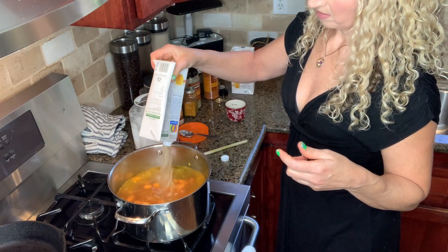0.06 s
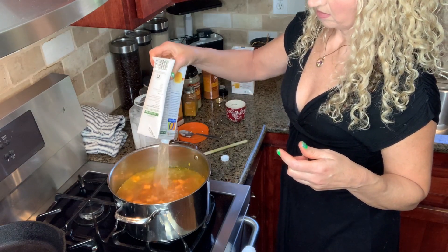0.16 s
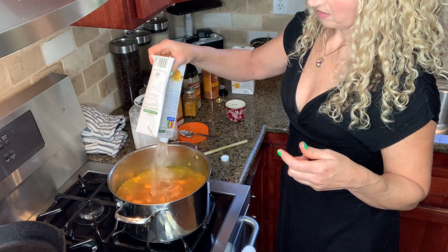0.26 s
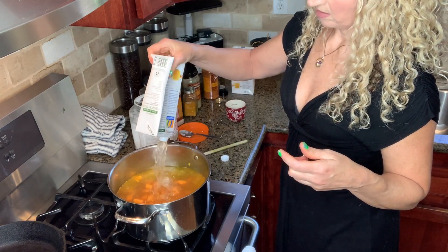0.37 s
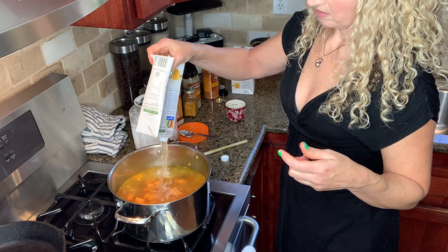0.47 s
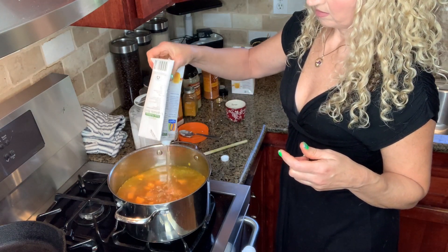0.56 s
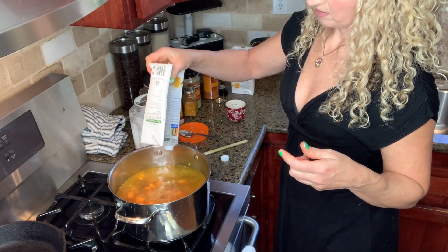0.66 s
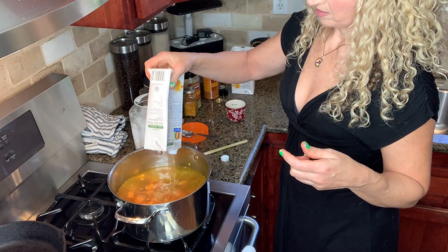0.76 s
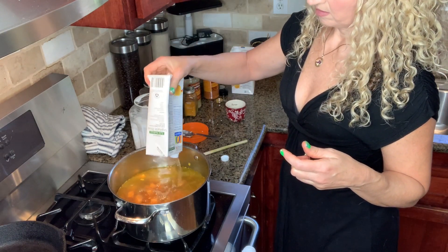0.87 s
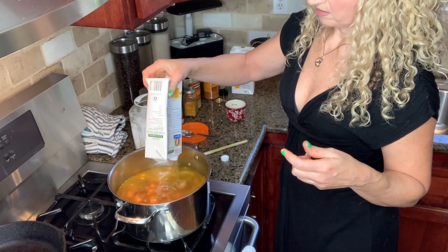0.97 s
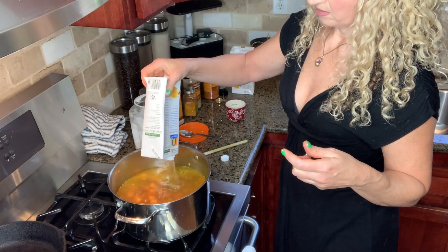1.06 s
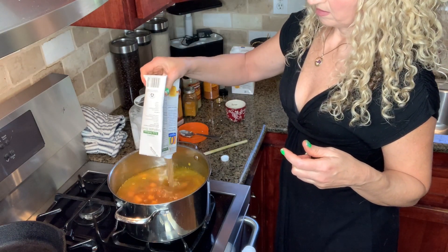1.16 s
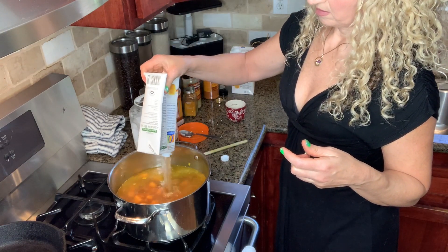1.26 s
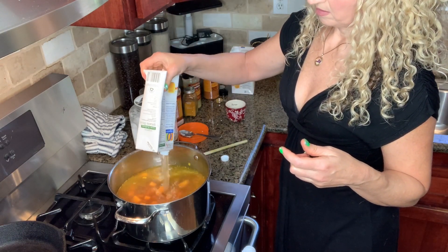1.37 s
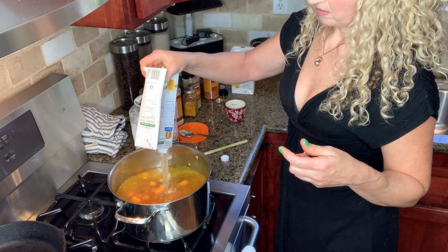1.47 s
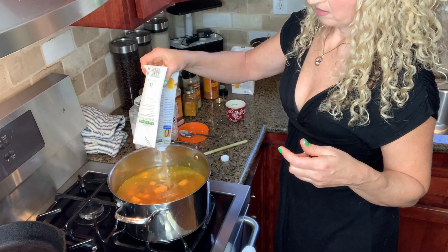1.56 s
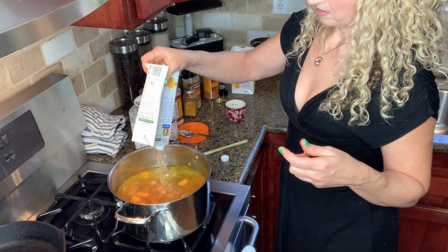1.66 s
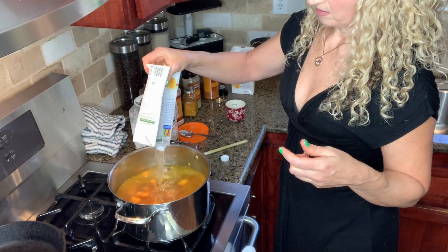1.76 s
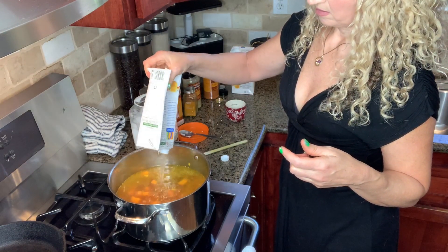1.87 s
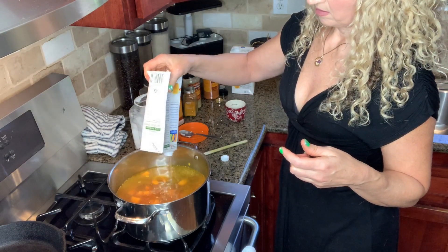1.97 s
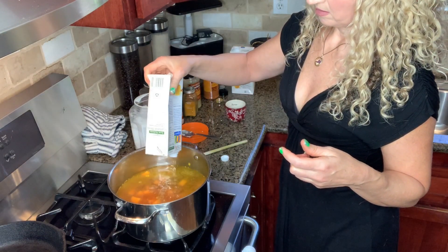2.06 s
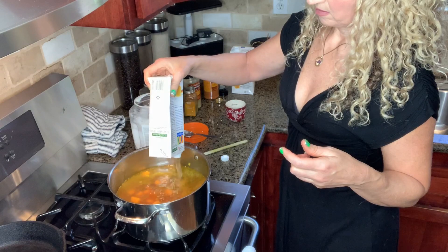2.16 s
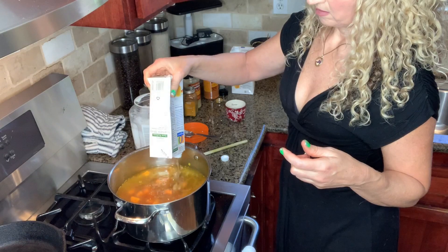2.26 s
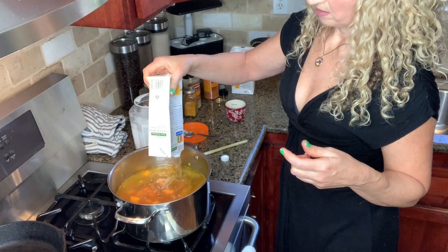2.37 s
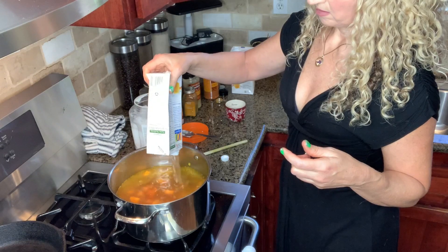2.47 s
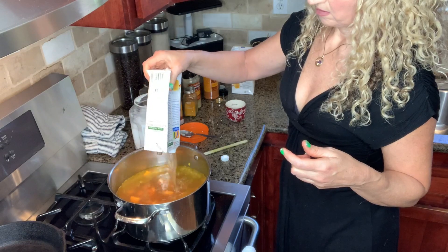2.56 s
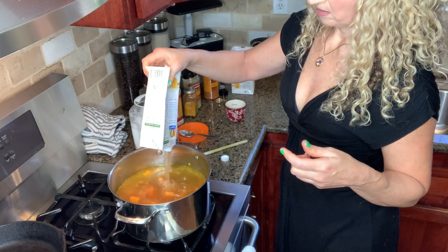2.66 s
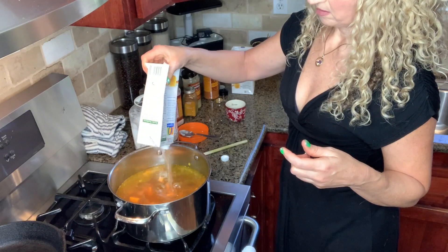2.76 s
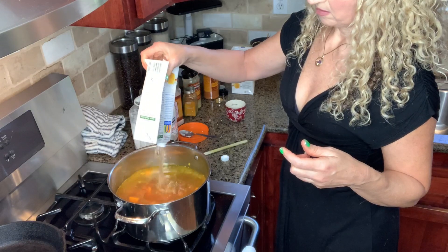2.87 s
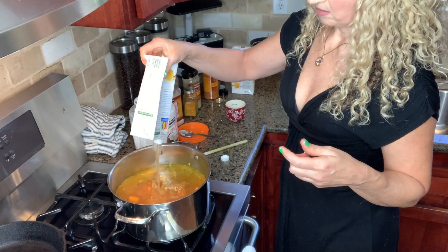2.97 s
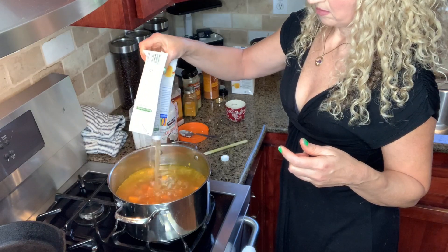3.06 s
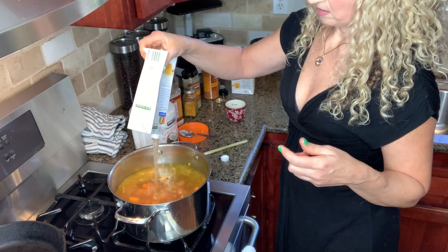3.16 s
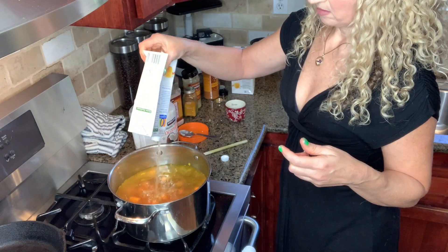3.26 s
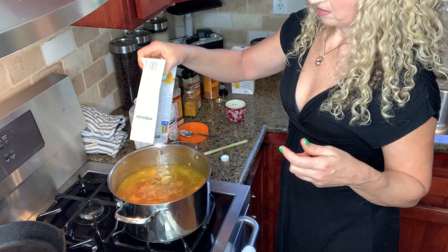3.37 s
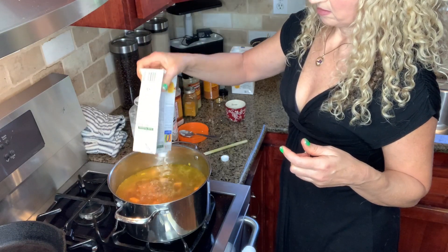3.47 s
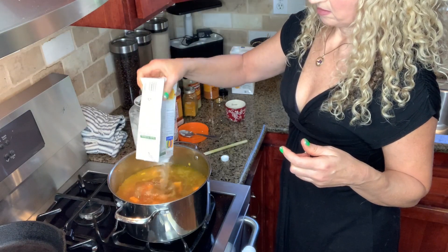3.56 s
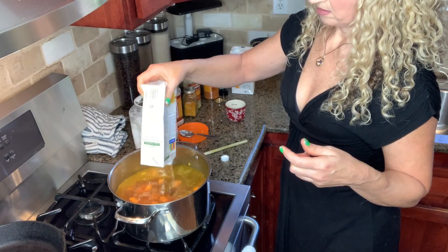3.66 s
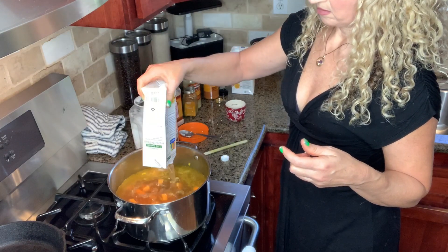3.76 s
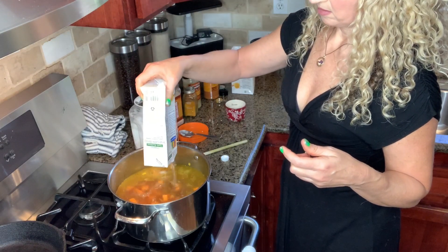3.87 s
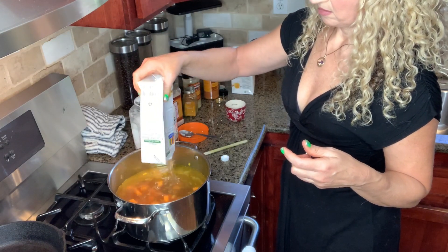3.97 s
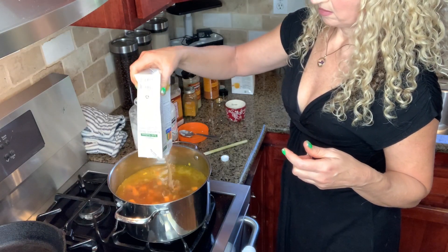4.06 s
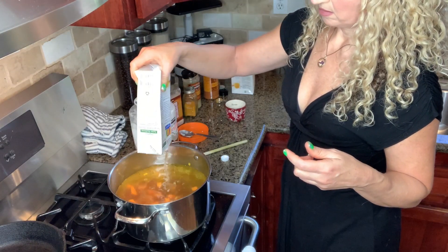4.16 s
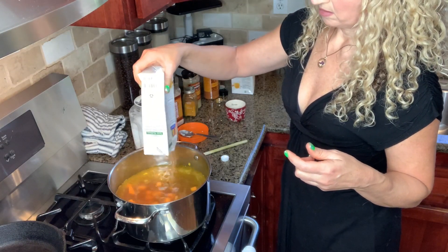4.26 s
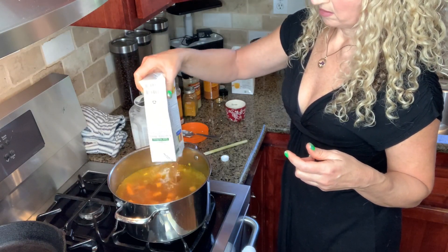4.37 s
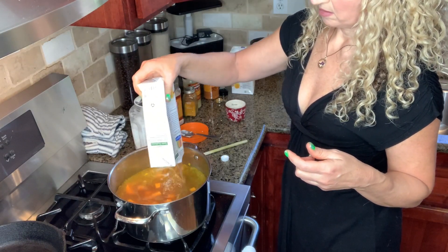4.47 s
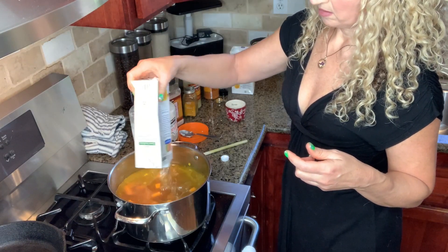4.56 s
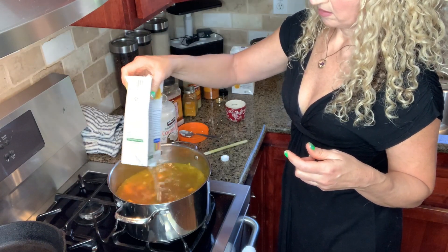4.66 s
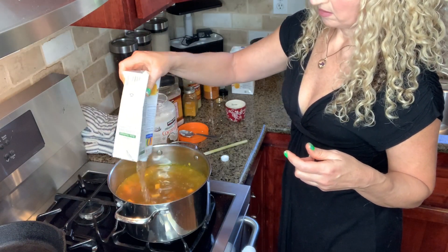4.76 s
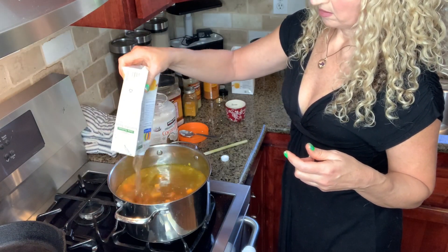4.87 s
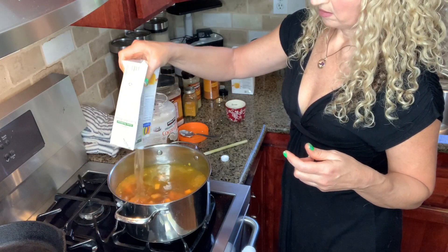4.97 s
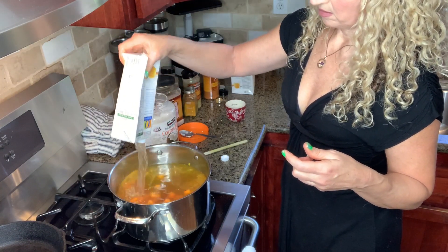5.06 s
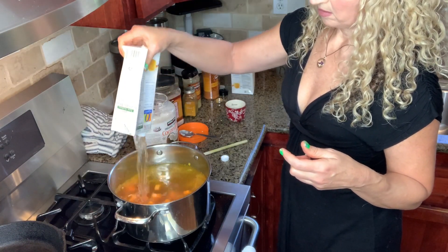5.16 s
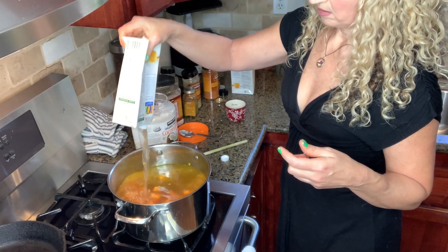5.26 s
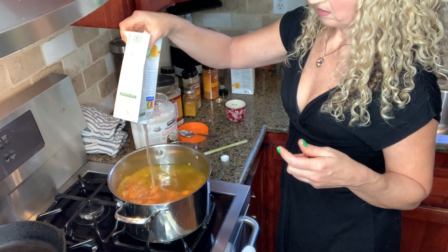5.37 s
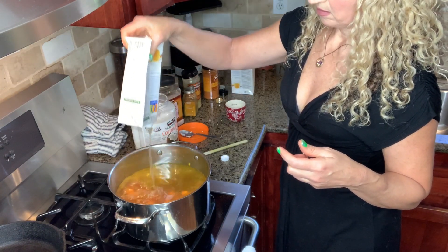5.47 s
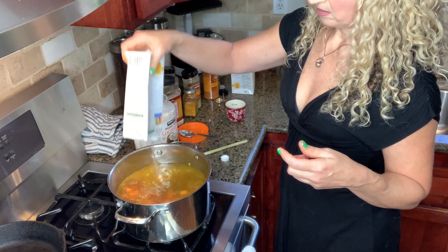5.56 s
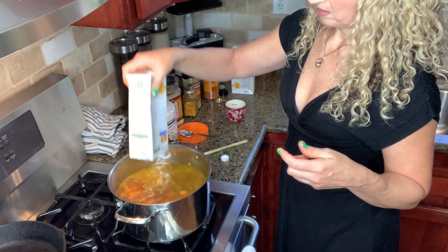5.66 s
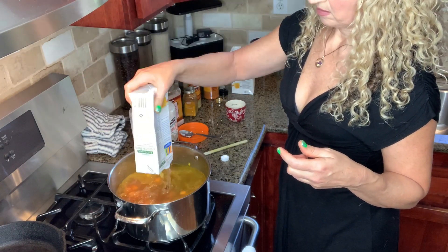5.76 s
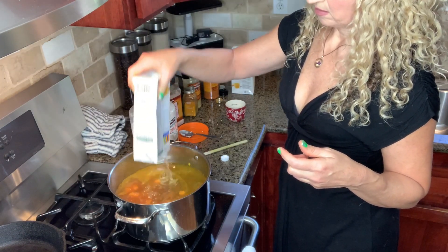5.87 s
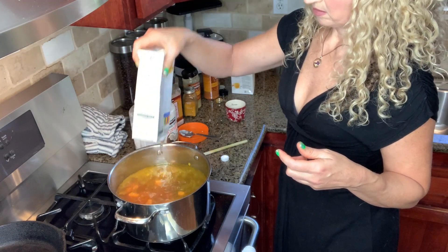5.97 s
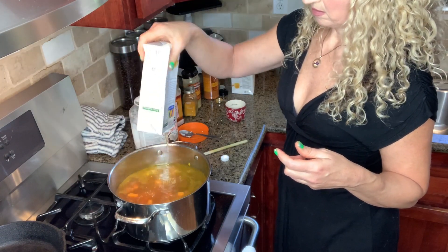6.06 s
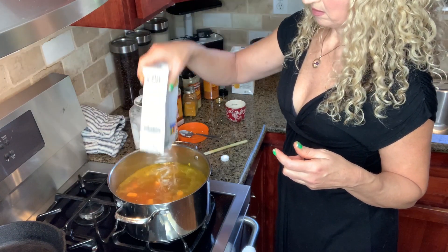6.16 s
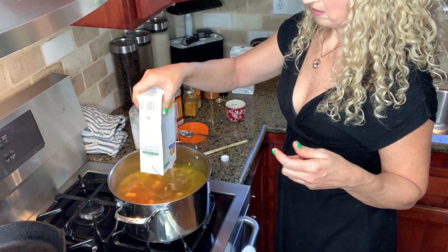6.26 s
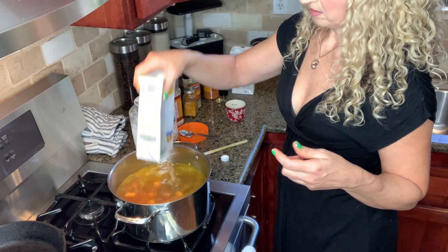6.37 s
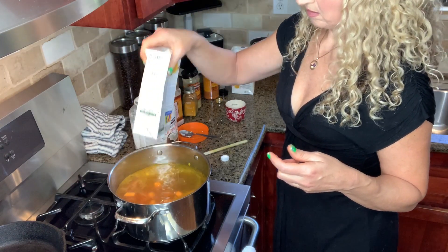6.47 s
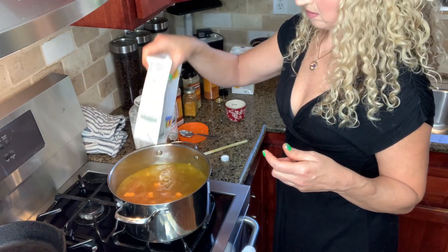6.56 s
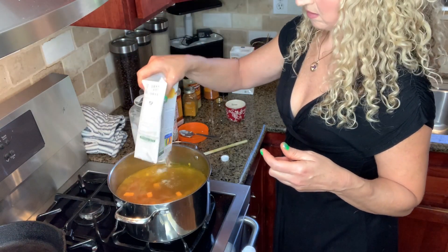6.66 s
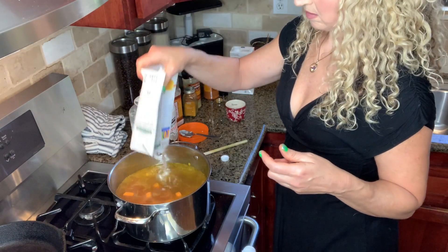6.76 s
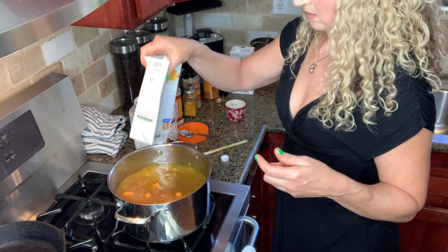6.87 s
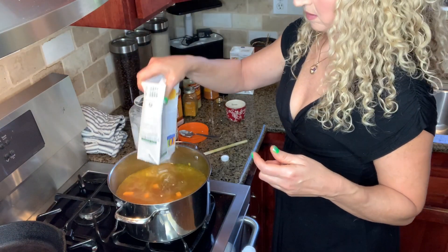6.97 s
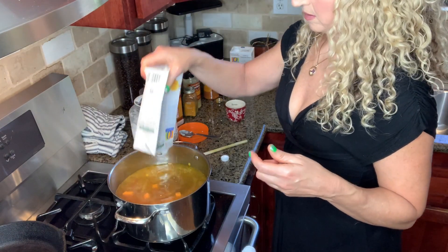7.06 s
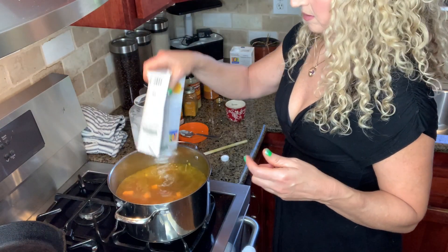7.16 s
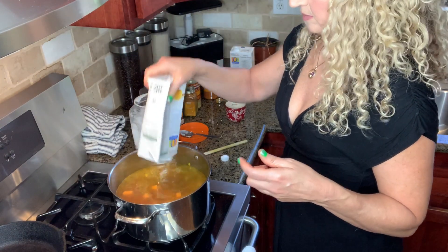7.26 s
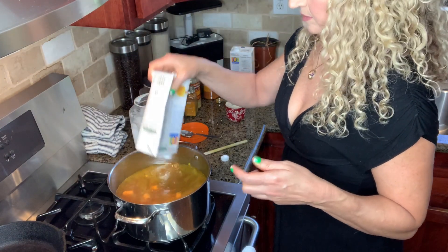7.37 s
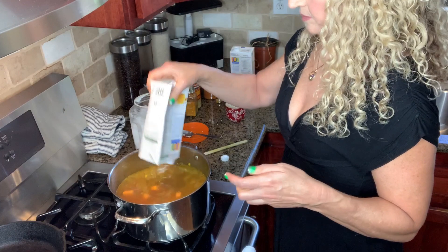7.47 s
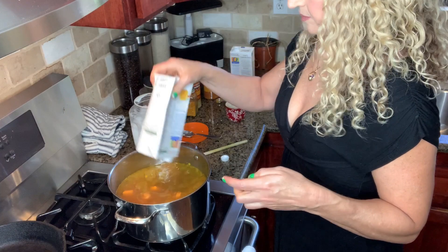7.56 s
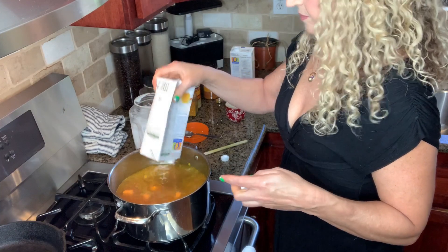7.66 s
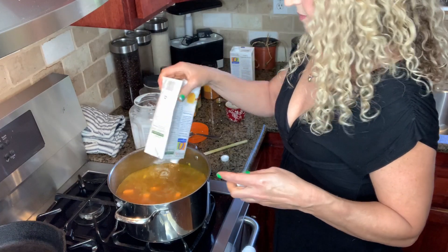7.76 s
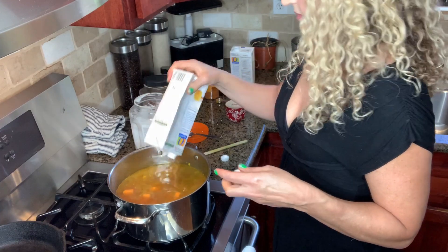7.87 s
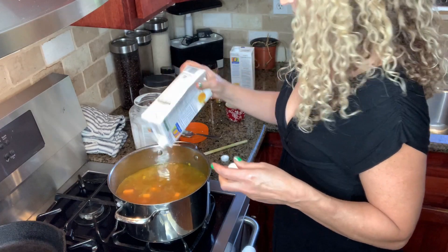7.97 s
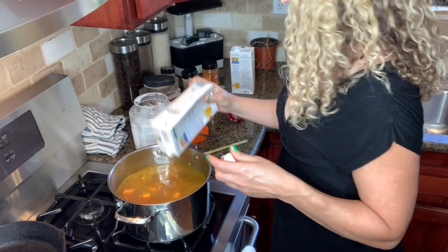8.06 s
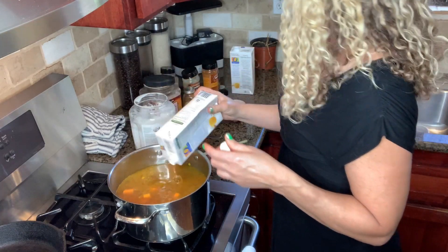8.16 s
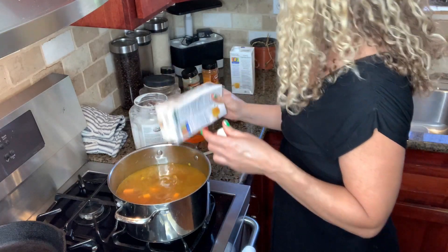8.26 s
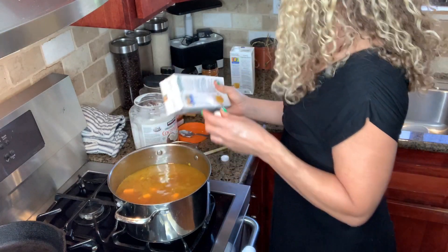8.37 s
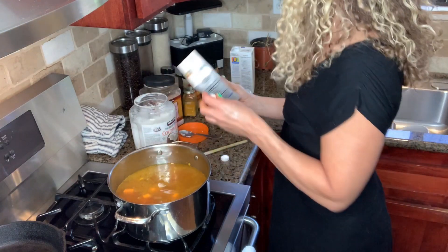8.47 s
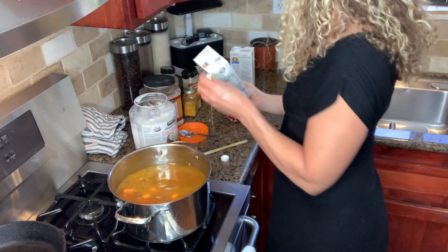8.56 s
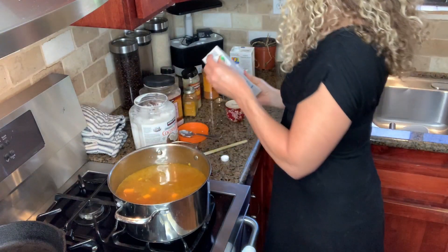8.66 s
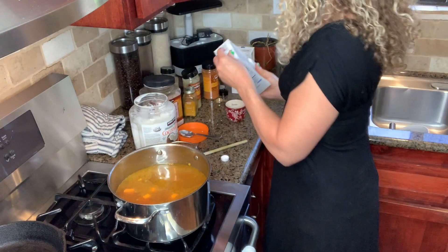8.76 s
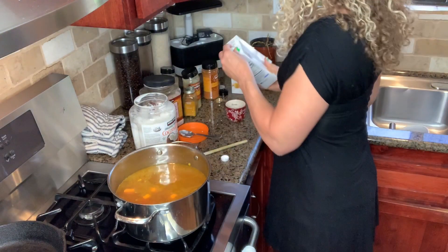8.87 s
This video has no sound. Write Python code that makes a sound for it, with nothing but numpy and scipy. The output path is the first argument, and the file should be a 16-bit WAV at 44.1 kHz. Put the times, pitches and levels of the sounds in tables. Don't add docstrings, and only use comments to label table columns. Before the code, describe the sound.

A close stereo microphone in a small, lightly reverberant kitchen, with a low steady appliance hum throughout. From 0 s broth pours from a carton into a pot of soup: an opening strong trickle, then uneven surges, round mid-pitched plops, small ringing bubbles and bright splashy ticks, with low hollow gulps near 0.7 and 2 s. The stream is fuller around 2.7 to 3.1 s, then breaks into bursts of plops until 4.8 s. A fresh gush comes at 4.9 s, with hollow glugs around 5.2 s. From 5.4 s it is shaken out in spatters and drops, fading after 6.4 s to sparse drips until about 7.2 s. Faint dull carton handling follows until 8 s. At 8.14 s a loud, hard, short knock strikes the counter, with several weaker bounces until 8.33 s. Near quiet returns, then from 8.8 s a soft, dry rub on card swells to the end.

```python
import sys
import numpy as np
from scipy import signal
from scipy.fft import rfft, irfft, next_fast_len
from scipy.io import wavfile

SR = 44100
rng = np.random.default_rng(int(sys.argv[2]) if len(sys.argv) > 2 else 0)


def elevation(decibels):
    levels = np.asarray(decibels, float)
    return 10 ** (levels / 20)


def dump(signal):
    limited = np.clip(np.atleast_2d(signal).T, -1, 1)
    pcm = np.round(limited * 32767).astype(np.int16)
    wavfile.write(sys.argv[1], SR, pcm)


N = 393813

# time_s, level_db
FLOW = [(0, -42), (.6, -57.5), (.85, -66.5), (1.1, -62.5), (1.6, -57.5), (2.35, -58), (2.55, -56),
        (2.68, -47.5), (2.86, -49), (3.05, -48), (3.35, -57.5), (4.0, -73.5), (4.7, -80.5), (4.919, -47),
        (5.3, -55.5), (6.11, -75.5), (6.39, -67), (6.48, -100), (7.55, -125)]
# time_s, level_db, lean_db (from big bubbles towards spray)
SURGES = [(0.724, -43, -4.5), (.97, -52.5, -0.5), (1.306, -43.5, 4), (1.511, -51.5, -4), (1.77, -59, -3),
          (1.91, -48.5, 2), (2.238, -50, -3.5), (3.489, -54, -1.5), (3.64, -49.5, 10.5), (3.73, -66, -12.5),
          (3.9, -55.5, 5.5), (4.14, -53.5, 10), (4.221, -61.5, -6.5), (4.422, -47.5, 8), (4.63, -57, 4.5),
          (4.76, -53.5, 1.5), (5.359, -48.5, -3), (5.568, -53.5, -8), (5.662, -48.5, 10), (5.8, -58, 12),
          (5.96, -58, -4), (6.2, -65, 22), (6.26, -81, -4.5), (6.329, -55.5, 5), (6.66, -84.5, 26),
          (6.75, -83.5, 28), (6.81, -79, 0), (6.959, -60, 10.5), (7.1, -71.5, 12), (7.38, -92, 21)]
# freq_hz, level_db (per Hz)
LARGE_COLOUR = [(180, -39), (300, 7.5), (366, -8.5), (609, -6), (685, -5), (2040, -8.5), (2200, -32),
                (2860, -50.5), (4840, -120)]
SMALL_COLOUR = [(880, -35.5), (1500, 4.5), (2500, 1.5), (2710, 3.5), (3630, 3.5), (4250, 5), (5740, 8.5),
                (9000, 3), (11700, -34), (19800, -120)]
SPRAY_COLOUR = [(5000, -30), (7500, -3.5), (9000, -2), (11000, -5.5), (13000, -7.5), (15500, -4),
                (17000, -0.5)]
# start_s, peak_db, pitch_hz, t60_s
PLOPS = [(0.013, -38, 587, 0.03), (0.173, -45.5, 526, 0.061), (0.689, -47, 1330, 0.026),
         (1.139, -47.5, 465, 0.029), (1.405, -39, 500, 0.019), (1.486, -44.5, 590, 0.047),
         (1.604, -42.5, 620, 0.027), (1.83, -45.5, 788, 0.025), (2.074, -38, 609, 0.05),
         (2.222, -31.5, 1270, 0.015), (2.636, -41.5, 500, 0.059), (2.819, -50, 783, 0.14),
         (3.004, -47.5, 655, 0.081), (3.694, -40, 750, 0.051), (3.744, -42.5, 1200, 0.021),
         (4.109, -34, 804, 0.02), (4.298, -36.5, 1065, 0.022), (4.4, -28.5, 626, 0.018),
         (4.509, -43, 740, 0.023), (4.736, -33.5, 720, 0.012), (4.812, -34.5, 870, 0.016),
         (5.062, -39.5, 730, 0.04), (5.337, -37.5, 533, 0.015), (5.507, -43, 830, 0.024),
         (5.747, -39, 1580, 0.022), (5.855, -38, 588, 0.031), (6.033, -40.5, 1106, 0.028),
         (6.241, -49, 1220, 0.044), (6.787, -44.5, 1010, 0.034), (7.083, -57.5, 1453, 0.12)]
# start_s, peak_db, pitch_hz
SPLASHES = [(.165, -36, 3700), (.2316, -29, 3060), (.4565, -35.5, 4000), (.5276, -28.5, 2080),
            (.6576, -31.5, 4670), (.736, -24, 6370), (.8912, -34, 5560), (.9404, -35, 2730),
            (.9612, -20, 4270), (.9625, -26.5, 2950), (.978, -38, 4740), (1.1386, -41, 4570),
            (1.2367, -30, 1990), (1.27, -37, 2250), (1.272, -37, 3750), (.672, -32.5, 3400),
            (.702, -35, 3240), (1.5125, -32, 6240), (1.5619, -47, 4100), (1.7942, -33, 2200),
            (1.8674, -35, 1890), (1.983, -28, 6040), (2.4368, -30, 5100), (2.5826, -31.5, 5580),
            (2.9175, -30.5, 3500), (3.003, -34, 2130), (3.3922, -30.5, 4830), (3.8025, -36, 2620),
            (4.0698, -42, 3980), (4.1091, -35, 3820), (4.2315, -45, 3300), (4.2974, -47, 3050),
            (4.6007, -32.5, 2380), (4.6573, -36.5, 2300), (4.8095, -33.5, 2760)]
# start_s, peak_db, pitch_hz
DRIPS = [(4.92, -33, 3370), (5.35, -33.5, 1980), (5.5562, -33.5, 6160), (5.6134, -32, 2040),
         (5.673, -31, 3120), (5.7978, -45, 2700), (5.8516, -27, 6040), (5.8524, -37, 2700),
         (5.9313, -28.5, 6830), (5.935, -40, 2740), (5.994, -43, 3090), (6.137, -38.5, 4660),
         (6.1923, -37.5, 6580), (6.2198, -29, 4160), (6.222, -34.5, 3010), (6.2831, -46, 2830),
         (6.289, -40, 1710), (6.323, -45, 854), (6.365, -49, 2770), (6.4, -50, 1830), (6.469, -55, 3900),
         (6.715, -53.5, 6100), (6.7825, -42, 3980), (6.8354, -52, 2290), (6.8448, -52, 4140),
         (6.8836, -50, 2820), (6.885, -48, 2020), (6.9085, -35, 6800), (6.9595, -41, 3400),
         (7.0695, -45, 3400), (7.1498, -65, 3400), (7.3033, -64.5, 3520)]
# start_s, peak_db
SPITS = [(0.23, -35.5), (0.46, -35), (0.7377, -27), (0.962, -34.5), (1.139, -36.5), (1.3056, -34),
         (1.514, -38), (1.5603, -29), (1.602, -34.5), (1.671, -34.5), (1.8005, -32), (2.941, -33.5),
         (3.875, -43), (3.945, -42), (3.995, -45.5), (4.022, -46.5), (4.046, -46), (4.121, -37.5),
         (4.283, -49.5), (4.331, -41.5), (4.4017, -30.5), (5.095, -35.5), (5.356, -34.5), (5.672, -35),
         (5.995, -37), (6.193, -36.5), (6.291, -42.5), (6.5331, -58.5), (6.6014, -58), (6.96, -41),
         (7.0214, -58.5), (6.875, -52.5), (7.125, -55), (7.176, -55), (7.21, -63.5), (7.256, -59.5),
         (7.361, -53.5), (7.585, -71.5), (8.3447, -63), (8.711, -66.5)]
# start_s, peak_db, start_pitch_hz
CHIRPS = [(2.06, -36.5, 2060), (2.19, -43, 1950), (2.36, -48, 1130), (3.877, -43.5, 915),
          (1.01, -47.5, 890), (3.385, -41, 498), (4.915, -41, 1105), (5.012, -41, 1063), (5.1, -39, 713),
          (5.2, -37, 493), (5.53, -45, 497), (5.574, -39, 705), (5.995, -51, 680)]
# start_s, peak_db, pitch_hz
BLIPS = [(.058, -54, 620), (.066, -57, 1127), (.1, -40, 1000), (.229, -43, 470), (.31, -46, 900),
         (.507, -38, 1090), (.529, -43, 498), (.61, -43, 593), (.735, -39, 520), (.818, -39, 1183),
         (1.225, -36.5, 920), (1.266, -58, 745), (1.285, -35, 900), (1.365, -47, 660), (1.52, -36, 766),
         (1.671, -41, 730), (1.794, -42, 1090), (1.893, -37, 1093), (2.018, -33.5, 1500), (2.24, -35, 1270),
         (2.255, -37, 1270), (2.309, -40, 1210), (2.439, -41.5, 875), (2.51, -41, 1000), (2.559, -38, 860),
         (2.584, -34.5, 1070), (2.72, -34.5, 844), (2.74, -42, 1180), (2.86, -48.5, 1230),
         (2.916, -39, 1200), (3.02, -37, 1180), (3.19, -41, 585), (3.355, -54, 1110), (3.395, -36, 1450),
         (3.47, -39, 680), (3.495, -45, 1180), (3.5, -43, 605), (3.63, -42, 1520), (3.671, -46, 910),
         (3.685, -35, 1910), (4.95, -31, 1590), (5.03, -43, 1600), (5.09, -33, 1550), (5.14, -35, 1400),
         (5.36, -35, 1600), (3.801, -39.5, 970), (4.025, -48, 1150), (4.108, -36, 1050), (4.117, -41, 508),
         (4.21, -48, 1150), (4.397, -32, 1200), (4.408, -45, 587), (4.592, -47, 1310), (4.735, -29.5, 1270),
         (4.885, -37.5, 650), (5.151, -39, 507), (5.673, -37.5, 1470), (6.012, -39, 894), (6.82, -52, 1050)]
# start_s, peak_db, pitch_hz
PINGS = [(.015, -46, 2050), (.1002, -39, 3900), (.165, -41, 2050), (.232, -41, 2050), (.285, -34, 2150),
         (.425, -42, 2010), (1.3, -37, 2050), (1.345, -42, 2050), (1.66, -46.5, 2070),
         (1.7389, -38.5, 4150), (1.7679, -42, 2830), (1.9565, -38.5, 3350), (2.37, -38, 2300),
         (2.5581, -38, 2800), (2.6254, -39.5, 2730), (2.755, -42, 2010), (2.88, -46, 2060),
         (2.94, -46, 2050), (3.0729, -38, 3500), (3.1288, -32.5, 4550), (3.165, -42, 2830),
         (3.285, -65, 2050), (3.395, -43.5, 2800), (3.5508, -35, 5560), (3.628, -47, 2700),
         (3.68, -42.5, 2700), (4.12, -40, 2240), (4.245, -44, 2700), (4.4, -38, 2176), (4.405, -36.5, 4350),
         (4.572, -54, 2050), (4.608, -38, 2700), (4.71, -47, 2700), (6.138, -43, 2870), (6.225, -50, 2810),
         (6.795, -59, 2270), (4.3281, -52, 2700), (4.3974, -49, 2760), (4.935, -34.5, 3400),
         (4.94, -36, 2110), (5.0809, -37, 3390), (5.17, -41, 2040), (5.2001, -40, 2080),
         (5.245, -40.5, 1960), (5.3043, -40.5, 2750), (5.455, -45, 2040), (5.613, -38, 3290),
         (5.627, -29, 7000), (5.6486, -37, 2780), (5.675, -28, 5920), (5.727, -42, 3800),
         (5.878, -32.5, 5100), (7.28, -70.5, 5370), (7.322, -66, 5600), (7.352, -66, 5780)]
# start_s, peak_db
TICKS = [(.529, -45), (.892, -49.5), (1.139, -46), (1.559, -39), (1.604, -44), (1.796, -39), (2.917, -30.5),
         (3.802, -46), (4.069, -41), (4.299, -37.5), (4.329, -38.5), (4.398, -33), (4.657, -41),
         (5.612, -38), (5.849, -41.5), (6.136, -56.5), (6.193, -46.5), (6.285, -45.5), (6.47, -73),
         (6.779, -44.5), (6.846, -50), (6.912, -50), (6.96, -42), (7.066, -48), (7.151, -61)]
# freq_hz, width_hz, level_db
POT_AIR = [(498, 14, 8.5), (603.2, 22, 7.5), (854, 52.3, 4.5), (1200, 140, 6.5), (1575, 210, -3),
           (2050, 50, 6.5), (2741, 34, 10), (3400, 39.4, 8), (3900, 570, 5)]
# start_s, peak_db, pitch_hz, t60_s
GULPS = [(0.66, -40, 141, 0.27), (0.697, -50, 162, 0.23), (0.729, -41, 308, 0.1),
         (1.984, -36.5, 157, 0.084), (5.064, -53, 60, 0.99), (5.154, -31.5, 302, 0.069),
         (5.202, -26, 279, 0.035), (5.224, -38, 298, 0.17), (5.256, -38.5, 294, 0.11),
         (5.3, -42, 303, 0.088), (5.201, -47.5, 148, 0.32), (5.384, -48, 305, 0.12),
         (5.339, -40, 297, 0.098), (5.358, -54, 62, 0.64)]
# start_s, level_db
KNOCK_CONTACTS = [
    (8.133, -37),
    (8.1403, -11.5),
    (8.163, -40),
    (8.176, -31.5),
    (8.198, -31.5),
    (8.233, -35),
    (8.286, -44.5),
    (8.33, -46),
]
# freq_hz, level_db, t60_s
COUNTER_MODES = [(62, -16, 0.34), (95.2, -15.5, 0.2), (121.1, -20, 0.39), (159, -19, 0.15),
                 (249, -21, 0.14), (315, -8.5, 0.042), (514, 2.5, 0.029), (626, -8.5, 0.041),
                 (890, 0, 0.028), (1160, -6, 0.018), (1212, -0.5, 0.029), (1270, -25.5, 0.045),
                 (1600, -15.5, 0.016), (2265, -3.5, 0.0059), (2700, -23, 0.01), (3820, -6.5, 0.005)]
# start_s, peak_db
HANDLING = [(7.409, -63), (7.569, -69), (7.596, -65), (7.635, -72), (7.79, -75.5), (7.881, -67),
            (7.981, -70), (8.019, -66)]
# time_s, level_db
RUB_LEVEL = [
    (8.78, -105),
    (8.819, -72),
    (8.861, -58),
    (8.891, -54.5),
    (8.93, -51.5),
]
# freq_hz, level_db (per Hz)
RUB_COLOUR = [(500, -2.5), (900, -4.5), (1300, -9), (1800, -6.5), (2600, -4), (4200, -10.5), (5900, -1),
              (7300, -13), (8600, -10), (15500, -20)]
# delay_s, level_db
POUR_WALLS = [(.0005, -9), (.0043, -10)]
# freq_hz, t60_s
KITCHEN_T60 = [(100, 1), (500, 0.22), (2000, 0.39), (6000, 0.058), (12000, 0.041)]
# freq_hz, likeness
ROOM_LIKENESS = [(120, .98), (400, .3), (1000, .1)]
# freq_hz, level_db (per Hz)
AIR_COLOUR = [(15, -72), (25, -37.5), (48, -7.5), (111, -10.5), (131, -22), (238, -1.5), (266, -14.5),
              (339, -12), (445, -14.5), (538, -18), (952, -23), (1180, -30.5), (16500, -76)]
# freq_hz, width_hz, rms_db
HUM = [(60, 15, -64), (132, 82, -69), (241.1, 7.6, -63.5), (292.4, 5.8, -74.5), (341.3, 9.2, -70),
       (3390, 412, -91)]
# freq_hz, likeness
AIR_LIKENESS = [(60, 0.8), (240, 0.81), (950, -0.078), (3770, -1.6), (15000, -0.15)]
# freq_hz, difference_db
AIR_BALANCE = [(60, 4.5), (380, -0.5), (2380, 0), (15000, -5)]
# freq_hz, phase_rad
PORT_PHASE = [(4500, 0), (6500, .9), (7900, 2.6), (9000, 3.14), (10700, 4.1), (12700, 5.75), (13400, 6.28)]
# freq_hz, share
PORT_MERGE = [(5000, 0), (7500, .1), (8300, .85), (9700, .85), (10500, .1), (12700, .1), (13400, .75),
              (15000, .6)]

USUAL_FLOW_DB = -55
SIDES = np.array([[1], [-1]])


def rms_one(x):
    return x / np.sqrt(np.mean(x ** 2) + 1e-20)


def at_hz(points, hz):
    table = np.array(points, float)
    return np.interp(np.log(hz + 1), np.log(table[:, 0] + 1), table[:, 1])


def coloured(x, spectrum):
    size = next_fast_len(N)
    hz = np.arange(size // 2 + 1) * SR / size
    return irfft(rfft(x, size) * elevation(at_hz(spectrum, hz)), size)[..., :N]


def drift(rate):
    r = np.exp(-80 * np.pi * rate / SR)
    slow = signal.lfilter([1], [1, -2 * r, r * r], rng.standard_normal(N // 40 + 2002))[2000:]
    return np.interp(np.arange(N) / 40, np.arange(len(slow)), rms_one(slow))


def resonance(x, hz, width_hz):
    r = np.exp(-np.pi * width_hz / SR)
    feedback = [1, -2 * r * np.cos(2 * np.pi * hz / SR), r * r]
    return signal.lfilter([(1 - r * r) / 2, 0, (r * r - 1) / 2], feedback, x)


def add(out, s, sound):
    i = max(round(s * SR), 0)
    out[i:i + len(sound)] += sound[:N - i]


def bubble(hz, t60, rise, attack_s):
    t = np.arange(int(t60 * SR) + 8) / SR
    tone = np.sin(2 * np.pi * hz * (t + rise * t * t / (2 * t60)))
    return tone * elevation(-60 * t / t60) * (1 - np.exp(-t / attack_s))


def burst(low_hz, high_hz, t60, attack_s):
    t = np.arange(4000) / SR
    band = signal.butter(3, [low_hz, min(high_hz, .45 * SR)], "band", fs=SR, output="sos")
    noise = rms_one(signal.sosfilt(band, rng.standard_normal(4000)))
    return noise * elevation(-60 * t / t60) * (1 - np.exp(-t / attack_s))


def clumps(shared, clump_db):
    wander = .3 * drift(8) + .55 * shared + .85 * drift(28)
    return elevation(clump_db * 1.6 * np.tanh(wander / 1.4))


def swarm(low_hz, high_hz, cycles, spread_db, clump_db, noise_db, spectrum, count):
    shared = drift(20)
    deep = clumps(shared, clump_db)
    bright = clumps(shared, clump_db)
    rings = np.zeros(N)
    for when, size, pitch, length in rng.random((count, 4)):
        hz = low_hz * (high_hz / low_hz) ** pitch
        note = bubble(hz, cycles * (.5 + length) / hz, 0.3, 0.47 / hz)
        add(rings, when * N / SR, elevation(-spread_db * np.log(size + 0.019)) * note)
    bed = elevation(noise_db) * rms_one(coloured(rng.standard_normal(N), spectrum))
    both = bed + rms_one(coloured(rings, spectrum))
    split = signal.butter(2, np.sqrt(low_hz * high_hz), fs=SR, output="sos")
    low = signal.sosfiltfilt(split, both)
    return rms_one(deep * low + bright * (both - low))


def stream():
    swing_db = np.interp(np.arange(N) / SR, *np.transpose(FLOW)) - USUAL_FLOW_DB
    fading_db = np.minimum(swing_db + 16.0, 0)
    large = np.sqrt(elevation(0.76 * swing_db + .1 * fading_db) ** 2 + surges(lambda lean: -lean))
    small = np.sqrt(elevation(swing_db) ** 2 + surges(lambda lean: -0.32 * abs(lean)))
    spray_surges = elevation(-19.5) * surges(lambda lean: lean)
    spray = np.sqrt(elevation(0.52 * swing_db + 0.44 * fading_db) ** 2 + spray_surges)
    broken = np.clip(-swing_db / 22 + 2.3, .3, 1)
    large_sound = swarm(400, 1866, cycles=16.0, spread_db=1.8, clump_db=5.0 * broken,
                        noise_db=-4.5, spectrum=LARGE_COLOUR, count=1250)
    small_sound = swarm(1900, 8000, cycles=45.0, spread_db=2.0, clump_db=4.4 * broken,
                        noise_db=-1.9, spectrum=SMALL_COLOUR, count=3400)
    spray_sound = swarm(7940, 14000, cycles=23.0, spread_db=4.5, clump_db=5.6,
                        noise_db=0.59, spectrum=SPRAY_COLOUR, count=1000)
    return elevation(-63) * large * large_sound + elevation(-58) * small * small_sound + elevation(-55) * spray * spray_sound


def surges(lean_gain):
    rise_db_per_s, fall_db_per_s = 139, 144
    t = np.arange(0, N, 32) / SR
    power = 0
    for s, db, lean_db in SURGES:
        slope = np.where(t < s, rise_db_per_s, -fall_db_per_s)
        power = power + elevation(db - USUAL_FLOW_DB + lean_gain(lean_db) + slope * (t - s)) ** 2
    return np.interp(np.arange(N) / SR, t, power)


def slugs():
    out = np.zeros(N)
    for s, db, hz in CHIRPS:
        add(out, s, elevation(db) * bubble(hz, t60=0.058, rise=0.59, attack_s=0.0049))
    for s, db, hz, t60 in PLOPS:
        t60 = np.clip(t60, .008, .3)
        add(out, s - .002, elevation(db + 4.5) * bubble(hz, t60, 0.2, 0.00228))
        add(out, s - .002, elevation(db - 8.5) * burst(0.54 * hz, 1.67 * hz, 2.0 * t60, 0.00027))
    for s, db, hz in list(SPLASHES) + list(DRIPS):
        t60 = 0.033 * (3500 / hz) ** 0.27
        add(out, s - .0004, elevation(db - 7.0) * bubble(hz, 0.75 * t60, 0.15, 0.00058))
        add(out, s - .001, elevation(db - 14.0) * burst(0.79 * hz, 1.35 * hz, 2.23 * t60, 0.0016))
    for s, db in SPITS:
        add(out, s - .001, elevation(db - 8.0) * burst(7000, 16500, 0.053, 0.00031))
    return out


def singles():
    out = np.zeros(N)
    for rows, cycles, rise in (BLIPS, 22.4, 0.037), (PINGS, 52.5, 0.013):
        for s, db, hz in rows:
            add(out, s - 1.086 / hz, elevation(db - 0.5) * bubble(hz, cycles / hz, rise, 2.7 / hz))
    return out


def ticks():
    out = np.zeros(N)
    for s, db in TICKS:
        add(out, s - .0004, elevation(db - 6.5) * burst(2000, 8200, 0.024, 0.00027))
    return out


def pot(x):
    peaks = sum((elevation(db) - 1) * resonance(x, hz, width) for hz, width, db in POT_AIR)
    return elevation(2.0) * (x + peaks)


def carton():
    out = np.zeros(N)
    for s, db, hz, t60 in GULPS:
        add(out, s, elevation(db) * bubble(hz, t60, 0.078, 0.0039))
    return out


def knock():
    out = np.zeros(N)
    for s, db in KNOCK_CONTACTS:
        for hz, level_db, t60 in COUNTER_MODES:
            uneven_db = 1.7 * np.tanh(rng.normal())
            add(out, s + 0.9 / hz, elevation(db + level_db + uneven_db) * bubble(hz, t60, 0, 2.9 / hz))
        add(out, s, elevation(db - 16.0) * burst(240, 2600, 0.052, 0.0016))
        add(out, s, elevation(db - 35.0) * burst(1900, 8900, 0.16, 0.00049))
        add(out, s, elevation(db - 30.0) * burst(7000, 17000, 0.01, 0.00048))
    return out


def rub():
    s, db = np.transpose(RUB_LEVEL)
    level_db = np.interp(np.arange(N) / SR, s, db, left=-140) + 1.3 * drift(30)
    return elevation(level_db) * rms_one(coloured(rng.standard_normal((2, N)), RUB_COLOUR))


def handling():
    out = np.zeros(N)
    for s, db in HANDLING:
        add(out, s, elevation(db - 7.5) * burst(900, 2900, 0.1, 0.0035))
    return out


def side_walls(x, walls):
    echoes = sum(elevation(db) * np.r_[np.zeros(round(s * SR)), x][:N] for s, db in walls)
    return x + echoes * SIDES


def kitchen(x):
    t = np.arange(SR // 2) / SR
    tail = 0
    for low in 40 * 2 ** np.arange(9.):
        band = signal.butter(2, [low, min(2 * low, .45 * SR)], "band", fs=SR, output="sos")
        mid, side = signal.sosfilt(band, rng.standard_normal((2, len(t))))
        centre_hz = np.sqrt(2) * low
        alike = at_hz(ROOM_LIKENESS, centre_hz)
        t60 = at_hz(KITCHEN_T60, centre_hz)
        octave = np.sqrt(1 + alike) * mid + np.sqrt(1 - alike) * side * SIDES
        tail = tail + octave * elevation(-60 * t / t60) / np.sqrt(t60)
    tail = tail * (1 - np.exp(-(t / 0.0018) ** 2))
    tail = tail / np.sqrt(np.sum(tail ** 2) / 2)
    return signal.fftconvolve(x[None], tail, axes=1)[:, :N]


def appliances():
    white = rng.standard_normal((2, N))
    noise = elevation(-59) * rms_one(coloured(white, AIR_COLOUR))
    for hz, width, db in HUM:
        hum = resonance(resonance(white[:, ::-1], hz, width), hz, width)
        noise = noise + elevation(db) * rms_one(hum)
    size = next_fast_len(N)
    hz = np.arange(size // 2 + 1) * SR / size
    alike = np.clip(at_hz(AIR_LIKENESS, hz), 0, 1)
    mid, side = rfft(noise, size)
    both = np.sqrt(1 + alike) * mid + np.sqrt(1 - alike) * side * SIDES
    both = both * elevation(SIDES * at_hz(AIR_BALANCE, hz) / 2)
    return elevation(-3.5) * irfft(both, size)[:, :N]


def scene():
    pour = pot(stream() + slugs() + singles() + ticks()) + carton()
    blow = knock()
    room = kitchen(elevation(-5.5) * pour + elevation(-3) * blow)
    struck = side_walls(blow, [(.00019, -11.5), (.0017, -12)]) * elevation(1.2 * SIDES)
    return side_walls(pour, POUR_WALLS) + struck + room + rub() + appliances() + handling()


def ports(x):
    size = next_fast_len(N)
    hz = np.arange(size // 2 + 1) * SR / size
    left, right = rfft(x, size)
    mid = (left + right) / 2
    side = (left - right) / 2 * (1 - at_hz(PORT_MERGE, hz))
    phase = at_hz(PORT_PHASE, hz)
    both = (mid + side * SIDES) * np.exp(.5j * phase * SIDES + .5j * phase)
    return irfft(both * (hz < 15800), size)[:, :N]


def low_pass(x):
    return signal.sosfilt(signal.butter(12, 16990, fs=SR, output="sos"), x)


def record(dry):
    shared, *own = rng.standard_normal((3, N))
    hiss = elevation(-89) * (shared + 1.5 * np.array(own))
    return low_pass(ports(dry + hiss))


dry = scene()
out = record(dry)
dump(out)
```